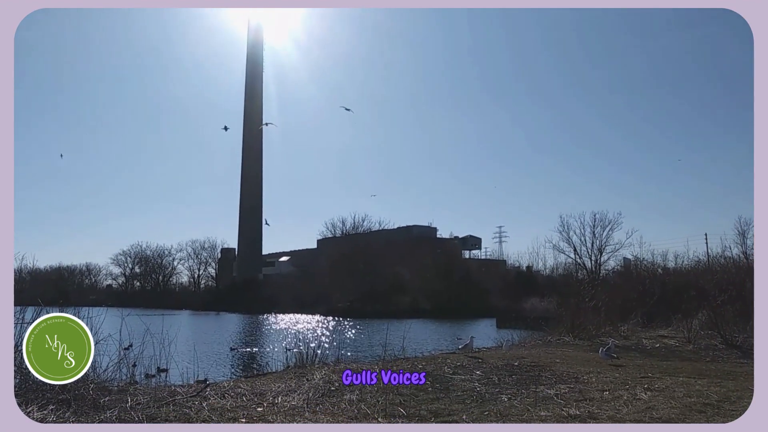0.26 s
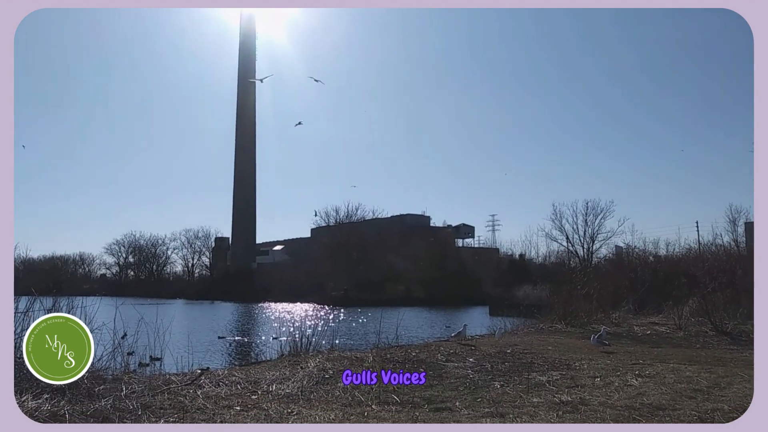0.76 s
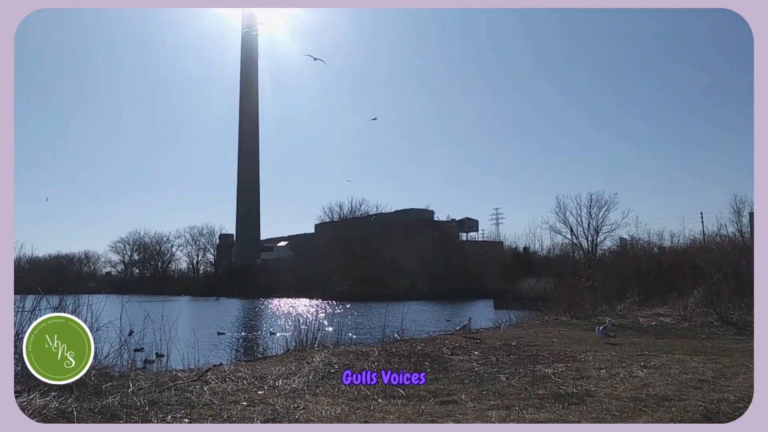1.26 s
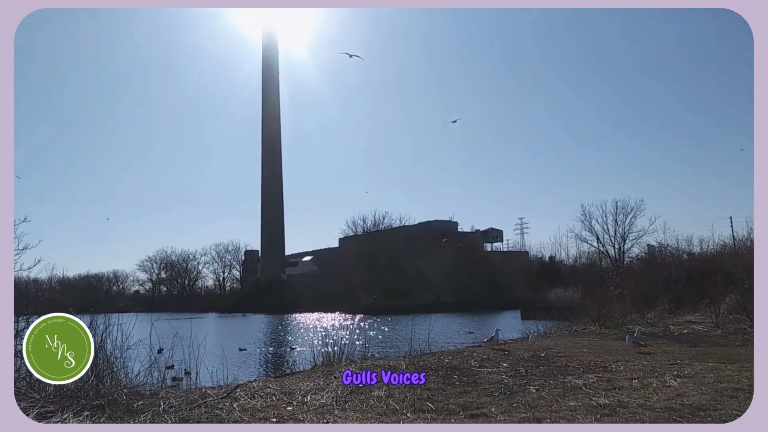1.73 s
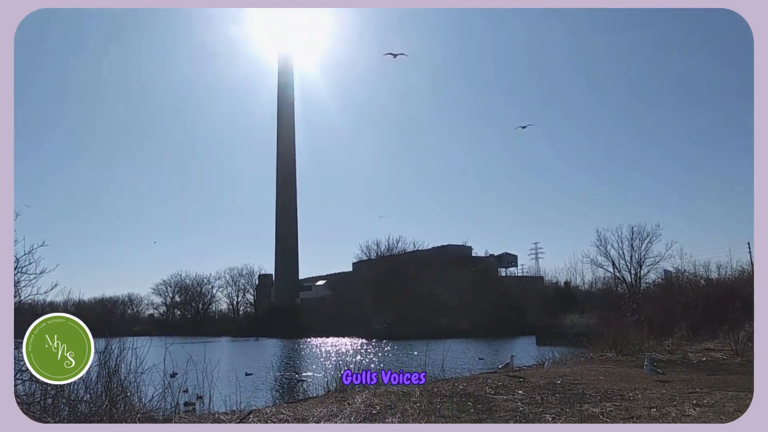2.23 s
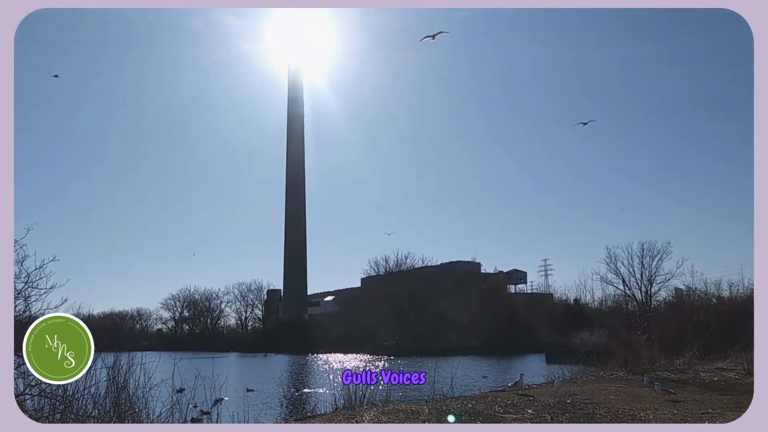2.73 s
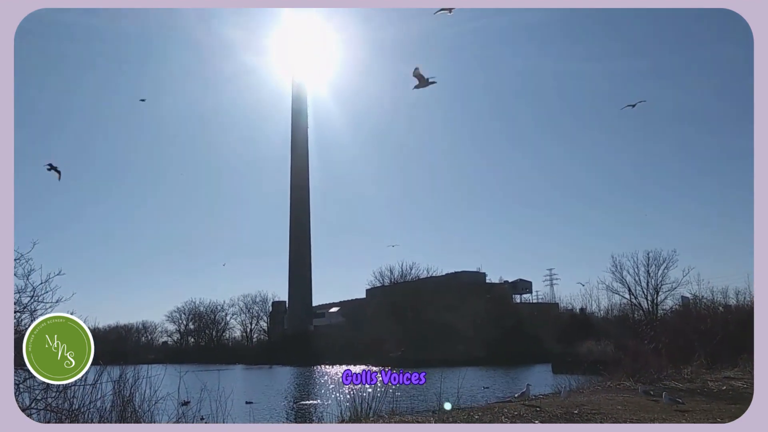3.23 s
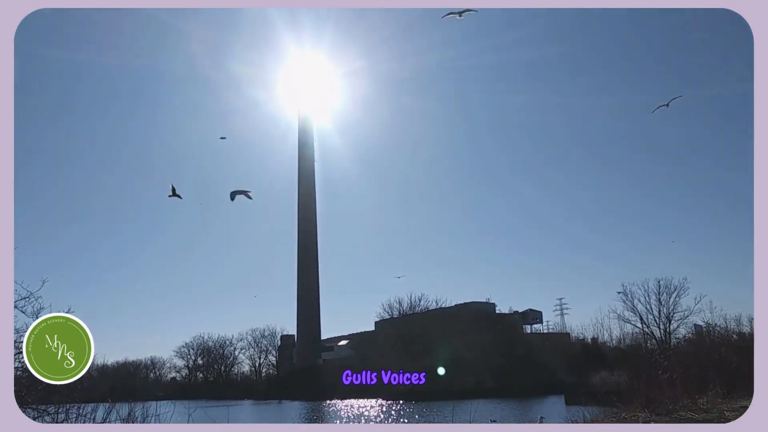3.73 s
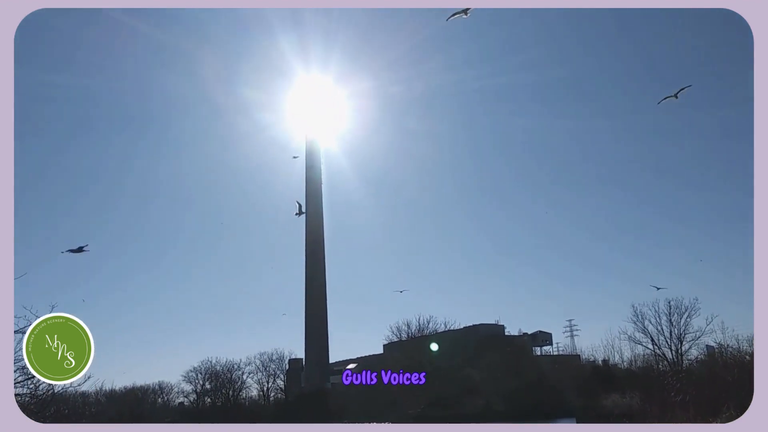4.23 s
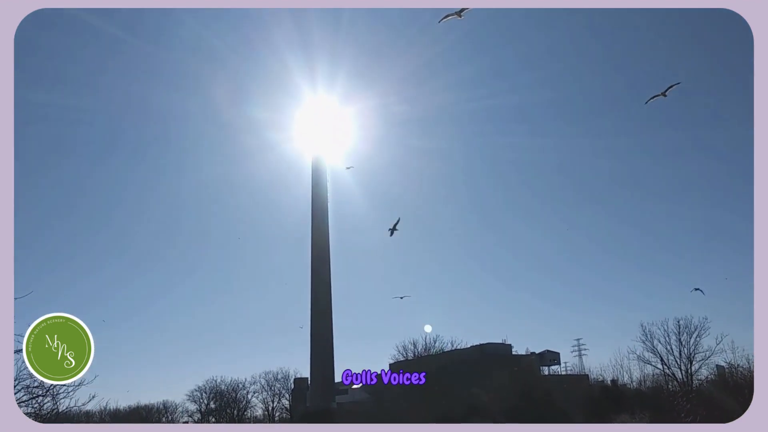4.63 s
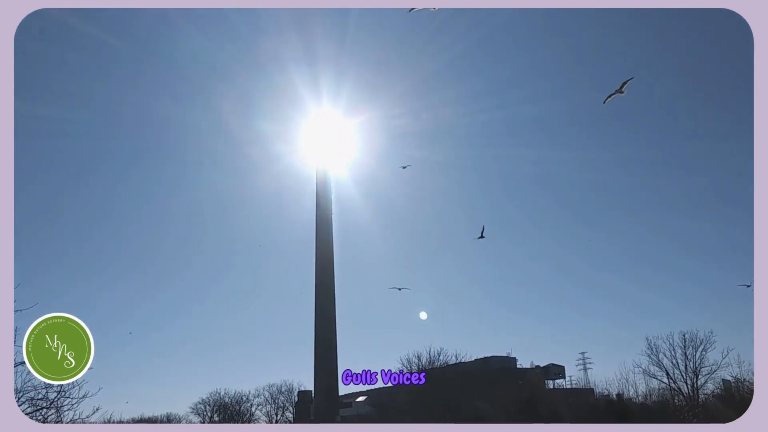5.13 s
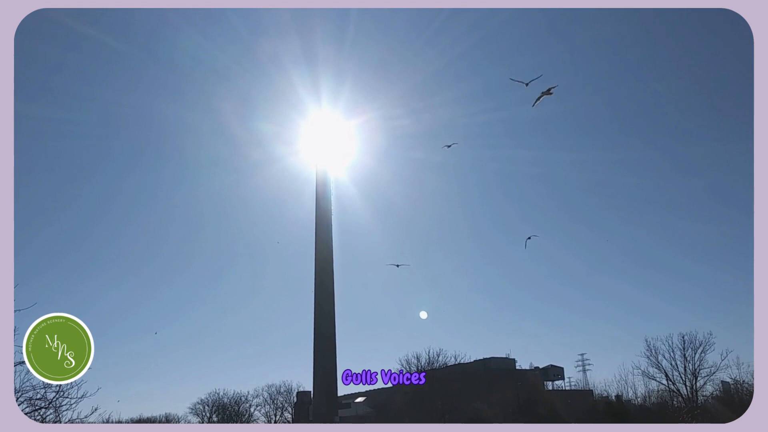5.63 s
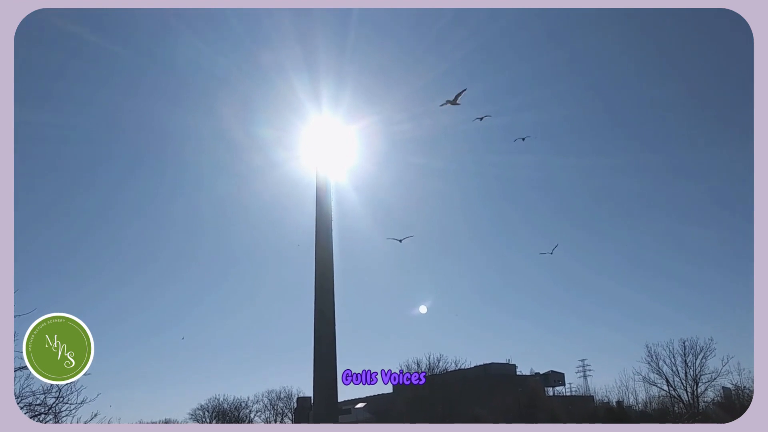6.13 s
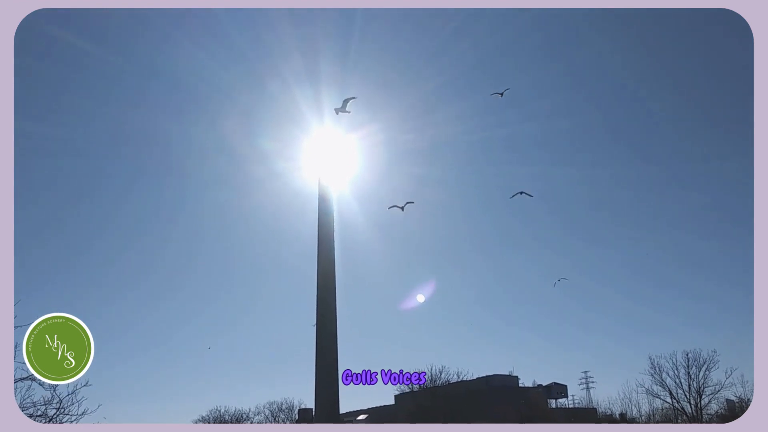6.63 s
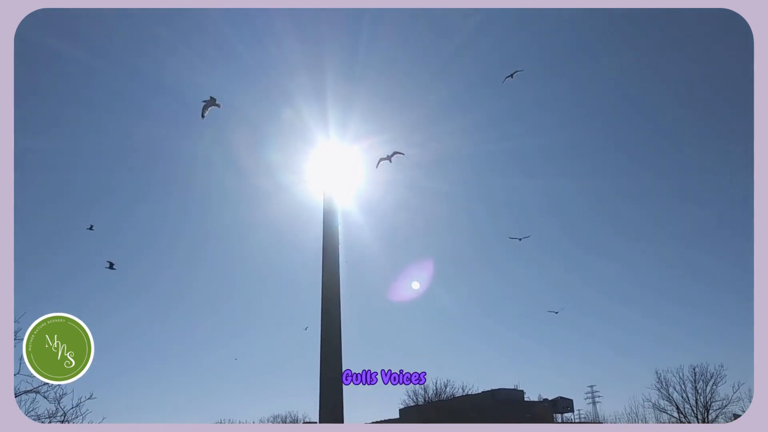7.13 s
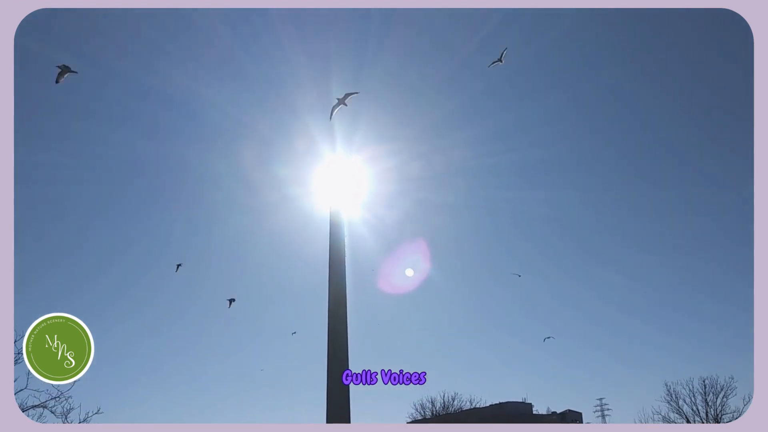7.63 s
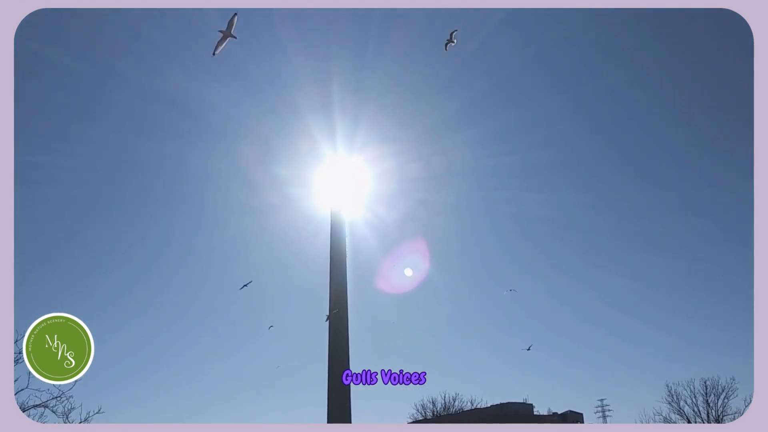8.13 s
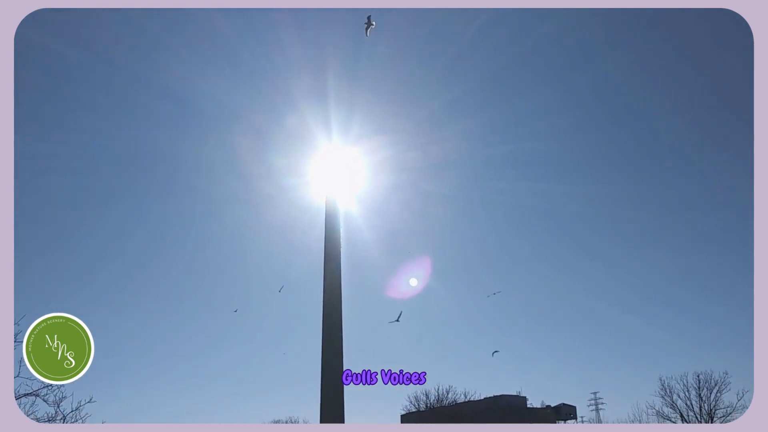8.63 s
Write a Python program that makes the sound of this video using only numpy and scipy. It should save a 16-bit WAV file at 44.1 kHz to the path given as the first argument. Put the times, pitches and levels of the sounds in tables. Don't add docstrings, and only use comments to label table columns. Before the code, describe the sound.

Many gulls wheel over a pond, overlapping mews, clear whistles and hoarse yelps, over a distant colony murmur and wind knocks on the microphone.

```python
import sys
import numpy as np
from scipy import signal
from scipy.fft import rfft, irfft
from scipy.io import wavfile
from scipy.ndimage import uniform_filter1d, minimum_filter1d

SR = 44100
rng = np.random.default_rng(int(sys.argv[2]) if len(sys.argv) > 2 else 0)


def level_to_linear(level):
    exponent = np.asarray(level, float) / 20
    return 10 ** exponent


def pcm_store(signal):
    levels = np.round(np.clip(np.atleast_2d(signal), -1, 1) * 32767)
    wavfile.write(sys.argv[1], SR, levels.astype(np.int16).T)


N = 391608


def amp_of_hz(points, hz):
    f, db = np.transpose(points)
    return level_to_linear(np.interp(np.log(hz + 1), np.log(f), db))


def evened(x):
    return x / np.sqrt(np.mean(x ** 2) + 1e-20)


def coloured(x, points):
    return irfft(rfft(x) * amp_of_hz(points, np.fft.rfftfreq(len(x), 1 / SR)), len(x))


def wobble(count, hz):
    width = max(int(SR / hz / 2), 1)
    smooth = uniform_filter1d(rng.standard_normal(count), width)
    return uniform_filter1d(smooth, width) * np.sqrt(1.7 * width)


def level(rows):
    s, db = np.transpose(rows)
    return level_to_linear(np.interp(np.arange(N) / SR, s, db))


def add(mix, s, sound):
    part = mix[round(s * SR):][:len(sound)]
    part += sound[:len(part)]


# f/Hz, level/dB
BEAK = [(600, -27), (1000, -12), (1500, -2), (2500, 1.5), (3300, 1.5), (4300, 5), (5500, -0.5), (9000, -10)]


def note(rows, throat_hz, rough, fall_db, odd_db=0, first_db=0, top_hz=12000):
    s, *columns = np.transpose(rows)
    t = np.arange(max(s[0] - .01 * rough, 0), s[-1] + .004, 1 / SR)
    hz, db = (np.interp(t, s, c) for c in columns)
    hz = uniform_filter1d(hz, 300)
    rough = np.clip(rough, 0, 1)
    jitter = 0.0035 * wobble(len(t), 36) + 0.125 * rough ** 2 * wobble(len(t), 300)
    turns = np.cumsum(hz * (1 + jitter)) / SR
    k = np.arange(1, top_hz // hz.max() + 1)[:, None]

    octaves = np.log2(k * hz / throat_hz)
    above, below = np.maximum(octaves, 0), np.minimum(octaves, 0)
    shape = level_to_linear(-fall_db * above + 7.23 * below) * amp_of_hz(BEAK, k * hz)
    soft_db = 0.53 * (db.max() - db)
    rate, phase = rng.random((2, len(k), 1))
    drift_db = (4 + 10 * rough) * np.sin(2 * np.pi * ((4 + 16 * rate) * t + phase))
    drift_db = drift_db * np.minimum(abs(octaves), 1)
    shape *= level_to_linear(odd_db * (k % 2) + first_db * (k == 1) + drift_db - soft_db * above)
    shape /= np.median(shape, 1).max()

    flutter = 1 + 0.99 * rough * np.sin(2 * np.pi * 150 * t + 3 * wobble(len(t), 60))
    flutter += 1.1 * rough ** 2 * wobble(len(t), 420)
    attack, release = (t - t[0]) / (.005 + .028 * rough), (t[-1] - t) / .006
    fade = np.minimum(np.minimum(attack, release), 1)
    partials = (shape * np.cos(2 * np.pi * (k * turns + phase))).sum(0)
    return t[0], np.sqrt(2) * level_to_linear(db) * fade * flutter * partials


# t/s, extra overtone fall/(dB per octave)
DISTANCE = [(0, -1), (.6, -4.5), (1, 11.5), (1.4, 0.8), (1.95, -3), (2.2, -0.9), (2.45, 5), (2.7, -3),
            (3.4, -1), (4.2, -4), (4.9, 10.5), (5.5, -6.5), (5.69, 8), (6.0, -5), (6.3, -5.5), (6.65, 5),
            (7.1, -8.5), (7.6, 5), (7.88, 5), (8.2, 4), (8.88, -2)]


def dulled(fall_db, s):
    return max(fall_db + np.interp(s, *np.transpose(DISTANCE)), 4)


def glide(row, voice, rough, power=1, bow=0, odd_db=0):
    start, length, first_hz, last_hz, db = row
    multiple, fall_db, swell_db, fade_db = voice
    u = np.linspace(0, 1, 9)
    hz = (first_hz + (last_hz - first_hz) * u ** power) * (1 + bow * np.sin(np.pi * u))
    db = db + swell_db * np.log2(hz / hz.mean()) + fade_db * (u - .5)
    throat_hz = multiple * hz.mean()
    if throat_hz < 1170:
        throat_hz *= 2
    return note(np.transpose([start + length * u, hz, db]), throat_hz, rough, dulled(fall_db, start), odd_db)


KINDS = "clear open halved hoarse droop rasp scream whistle sigh bow thin yelp".split()
# throat/pitch, overtone fall/(dB per octave),
# louder when higher/(dB per octave), fade over the note/dB
VOICES = [(2.15, 21.5, 10.5, -2), (2.85, 27.5, 8, -3.5), (2.01, 22.5, 4.5, 1), (2.1, 20.5, 4.5, -5),
          (2.02, 19.5, 26.5, -2), (2.2, 22, 9.5, -3), (3.3, 24.5, 23.5, -4), (1.01, 16, 6.5, -1),
          (1.01, 23, -6.5, -10.5), (1.01, 22, 56, -4.5), (1.01, 42, 4, -6)]
YELP_VOICE = (4, 37.5, 7, -6.5)
ROUGH = [.15, .1, .1, .38, .27, .57, .45, .06, .06, .06, .06]


def sing(out, kind, rows, **contour):
    i = KINDS.index(kind)
    voice, rough = (VOICES + [YELP_VOICE])[i], (ROUGH + [0.31])[i]
    for row in rows:
        add(out, *glide(row, voice, rough, **contour))


# start t/s, length/s, first f/Hz, last f/Hz, level/dB
CLEAR = [(.06, 0.38, 1014, 991, -56), (1.41, 0.033, 935, 975, -34), (6.334, .014, 1010, 1000, -33),
         (7.315, .042, 839, 895, -27), (7.83, .045, 826.5, 900, -28.5), (7.91, 0.22, 761, 618, -46),
         (8.295, .04, 754, 827, -26), (8.4, 0.17, 938, 850, -38.5)]
OPEN = [
    (6.37, 0.16, 950, 905, -41.5),
    (8.31, 0.059, 855, 908, -30.5),
    (2.655, 0.058, 610, 760, -37),
]
HALVED = [(7.385, .185, 1028, 983, -30)]
DROOPS = [
    (2.12, 0.11, 887, 662, -69),
    (7.2, 0.073, 756, 653, -41.5),
]


def clear_calls(out):
    sing(out, "clear", CLEAR)
    sing(out, "open", OPEN)
    sing(out, "halved", HALVED, odd_db=-13.5)
    sing(out, "droop", DROOPS, power=2.5)


HOARSE = [(.44, .105, 569, 790, -39.5), (3.492, 0.094, 556, 791, -46.5), (0.126, 0.075, 700, 1059, -55),
          (0.352, 0.044, 798, 680, -50), (.741, .068, 705, 655, -45), (.808, .065, 670, 570, -45),
          (.872, .022, 650, 550, -48), (6.55, .03, 760, 520, -43), (6.565, .04, 640, 800, -43),
          (5.69, .04, 760, 625, -45), (6.72, .095, 790, 700, -38.5), (2.712, .062, 761, 787, -38.5),
          (2.979, 0.15, 1030, 990, -54.5), (6.225, 0.048, 735, 573, -37.5), (6.34, .21, 775, 625, -39.5),
          (2.483, 0.038, 755, 731, -46), (8.092, 0.017, 871, 707, -30), (8.56, 0.11, 766, 666, -44),
          (8.77, .105, 720, 680, -36)]
YELPS = [
    (2.0, 0.096, 795, 804.6, -42),
    (6.043, 0.033, 525, 650, -34),
    (6.799, 0.051, 568, 730, -36),
]
RASPS = [(8.172, .05, 608, 866, -45.5), (2.07, 0.033, 831, 863, -43), (4.411, .07, 615, 887, -42.5),
         (1.697, .035, 800, 600, -50), (1.997, .02, 900, 800, -40), (2.645, .02, 600, 620, -44),
         (6.266, .025, 614, 802, -36.5), (7.285, .03, 640, 732, -36.5), (7.354, 0.033, 851, 841, -33),
         (7.575, 0.024, 870, 740, -27.5), (7.812, 0.03, 641, 801, -36.5), (7.875, 0.023, 962, 866, -27),
         (8.263, 0.038, 668, 767, -36.5), (8.335, .065, 790, 915, -30), (8.53, 0.017, 920, 727, -29.5)]
SCREAMS = [(0.48, 0.3, 909, 662, -50.5), (2.12, 0.12, 912, 699, -51.5), (6.345, 0.12, 990, 930, -44.5),
           (7.199, 0.049, 905, 757, -47.5), (1.92, 0.045, 599, 690, -41), (1.216, 0.057, 690, 870, -50.5),
           (1.385, 0.026, 590, 730, -42), (4.078, 0.062, 790, 930, -48), (5.425, 0.04, 600, 810, -41),
           (6.975, 0.047, 600, 900, -39), (8.672, 0.027, 645, 635, -38), (8.53, .1, 900, 660, -46.5),
           (8.775, .07, 900, 920, -42), (3.47, .05, 700, 800, -55)]


def rough_calls(out):
    sing(out, "hoarse", HOARSE)
    sing(out, "yelp", YELPS)
    sing(out, "rasp", RASPS)
    sing(out, "scream", SCREAMS)


WHISTLES = [(0, 0.061, 1806, 1897, -47.5), (1.328, 0.117, 2490, 2370, -35),
            (1.501, 0.22, 1680, 1800, -47.5), (2.415, 0.071, 1503, 1436, -42),
            (2.811, 0.076, 1910, 1989, -36.5), (7.39, 0.13, 2300, 2240, -42.5),
            (7.62, 0.21, 2035, 2040, -65), (7.7, .11, 2790, 2760, -60), (8.4, 0.13, 2062, 1943, -31),
            (8.621, 0.18, 2330, 2300, -44)]
SIGHS = [
    (0, 0.04, 1310, 1146, -47),
    (.62, 0.075, 1908, 1830, -40.5),
    (.927, 0.15, 1940, 1730, -48),
    (3.15, 0.15, 1966, 1776, -49.5),
    (4.26, 0.24, 2270, 2110, -51),
]
BOWS = [
    (.445, 0.1, 1750, 1800, -38),
    (1.04, 0.15, 2090, 1930, -54),
    (5.12, .11, 1797, 1743, -53),
]
THIN = [(2.885, 0.063, 2423, 2493, -32.5), (.425, .025, 1500, 1520, -46), (2.335, 0.099, 2600, 2200, -55),
        (5.05, .065, 1945, 1930, -52), (5.05, .065, 2920, 2900, -60), (0.885, .045, 1490, 1530, -47),
        (1.735, .15, 1480, 1320, -56), (3.595, 0.077, 1880, 1800, -44), (4.811, .006, 2500, 2430, -22),
        (.06, .04, 1490, 1490, -52.5), (3.605, 0.05, 2560, 2050, -39), (7.52, .04, 2230, 2050, -45),
        (7.6, .045, 1450, 1350, -48), (5.319, 0.17, 1860, 1898, -55), (8.235, 0.075, 2000, 1990, -45),
        (.57, .05, 1620, 1590, -41.5), (4.235, .03, 2700, 2820, -52), (.95, 0.089, 2600, 2500, -61.5),
        (3.3, 0.092, 2050, 2000, -60.5), (3.66, .1, 4300, 3780, -62), (.56, .125, 4580, 3900, -48.5),
        (5.62, .065, 2150, 1960, -34), (5.62, .06, 4300, 4000, -53), (5.63, .05, 2460, 2350, -46),
        (5.28, .05, 1500, 1560, -60), (5.23, .05, 2450, 2300, -62), (8.7, .07, 1345, 1440, -36),
        (7.128, .05, 4640, 4380, -38), (8.475, .05, 2500, 2520, -42), (5.2, .08, 1250, 1400, -65.5)]


def whistles(out):
    sing(out, "whistle", WHISTLES)
    sing(out, "sigh", SIGHS)
    sing(out, "bow", BOWS, bow=.07)
    sing(out, "thin", THIN)


# start t/s, length/s, top f/Hz, level/dB, throat/top pitch
MEWS = [
    (0.545, 0.2, 773, -32.5, 1.85),
    (2.776, .11, 850.4, -27, 1.85),
    (3.573, .205, 797, -36.5, 1.85),
    (4.474, .215, 896, -35.5, 2.45),
]
# share of length, share of top pitch, level/dB
MEW = [
    (0, 1, 1.5),
    (.45, 0.91, -5),
    (.88, .81, -7),
    (1.002, 0.68, -17),
]
# overtone fall/(dB per octave), odd partials/dB, first partial/dB
MEW_COLOURS = [(17.8, -11.5, 15.5), (25, -4, 1.5), (30, -11.5, 12.5), (32.3, -2.5, 11)]


def mews(out):
    for (start, length, hz, db, multiple), colour in zip(MEWS, MEW_COLOURS):
        rows = [(start + u * length, hz * share, db + d) for u, share, d in MEW]
        add(out, *note(rows, multiple * hz, .22, *colour))


# t/s, f/Hz, level/dB
PEALS = [
    [(6.85, 713, -30), (6.928, 798, -26.5), (6.945, 758, -28.5), (6.965, 625, -49.5)],
    [(8.81, 967, -42), (8.835, 966.4, -32), (8.845, 1151, -30), (8.88, 1160, -26)],
    [(1.25, 959, -37), (1.27, 954, -40.5), (1.285, 1003, -38.5), (1.325, 1003, -37), (1.334, 1050, -35)],
    [(1.44, 1010, -35), (1.453, 1150, -37), (1.49, 1200, -36), (1.55, 1098, -39.5), (1.59, 1088, -40),
     (1.603, 1156, -47), (1.7, 930, -45.5)],
    [(6.077, 807, -26.5), (6.122, 840, -26.5), (6.134, 875, -28.5)],
    [(6.293, 818, -27), (6.32, 843, -28), (6.333, 880, -30)],
    [(6.607, 856, -36.5), (6.67, 859, -34.5), (6.7, 868, -36.5), (6.712, 900, -40)],
    [(.203, 1110, -43.5), (.31, 1110, -46.5), (.335, 1050, -50), (.355, 900, -58)],
    [(1.955, 796, -44), (1.98, 827, -36.5), (2.002, 975, -36.5)],
    [(2.525, 637, -41.5), (2.59, 586, -47.5), (2.62, 629, -46), (2.645, 569, -49.5)],
    [(4.82, 860, -35), (4.845, 833, -37.5), (4.885, 700, -40)],
    [(7.015, 983, -30.5), (7.045, 1000, -31.5), (7.075, 1020, -24.5), (7.085, 982, -26.5), (7.13, 996, -28)],
    [(5.46, 905, -42), (5.505, 942, -36.5), (5.55, 976, -37), (5.6, 914, -39), (5.68, 846, -52)],
    [(6.135, 771, -30), (6.175, 760, -32), (6.222, 647, -39)],
    [(7.0, 961, -39), (7.03, 991, -37.5), (7.06, 997, -36.5)],
    [(3.15, 1235, -80), (3.21, 1240, -66), (3.35, 1192, -70), (3.5, 1170, -68)],
]
# t/s, f/Hz, level/dB
CRIES = [
    [(2.715, 381, -36), (2.735, 381, -35), (2.76, 386, -38)],
    [(8.218, 860, -40), (8.26, 862, -38), (8.31, 868, -40)],
    [(8.697, 670, -38), (8.73, 682, -36), (8.772, 725, -35)],
    [(5.44, 800, -40), (5.47, 770, -36), (5.505, 745, -41)],
]
# throat f/Hz, overtone fall/(dB per octave), odd partials/dB
PEAL_THROATS = [(2330, 20, 2.5), (2300, 24, -2), (2010, 17, -5.5), (2300, 23.5, 0), (2390, 20.5, -1),
                (1980, 22, 0), (2630, 62, 1.5), (2240, 16, -12), (2632, 26.5, -1), (1560, 30, -2.5),
                (2620, 36, 3.5), (1970, 18, -22.5), (1980, 13.5, -25), (2980, 22, -6.5), (3000, 13.5, 5),
                (4900, 43, 2), (1900, 20, 6), (2600, 40, 3), (3100, 45, -5), (2300, 20, 2)]
PEAL_ROUGH = [.1, .1, .1, .1, .08, .1, .08, .08, .25, .2, .45, .2, .17, .5, .36, .55, .1, .08, .12, .42]


def peals(out):
    for rows, (throat_hz, fall_db, odd_db), rough in zip(PEALS + CRIES, PEAL_THROATS, PEAL_ROUGH):
        add(out, *note(rows, throat_hz, rough, fall_db, odd_db))


# t/s, f/Hz, level/dB
HELD = [
    [(.06, 3060, -48.5), (.21, 2968, -46), (.3, 3042, -44), (.45, 2968, -42.5), (.48, 2850, -40.5)],
    [(1.71, 2974, -48), (1.8, 2943, -50), (1.9, 2980, -48.5), (2.08, 2905, -46.5), (2.105, 2600, -38)],
    [(2.1, 1950, -31), (2.405, 1935, -38), (2.425, 1780, -38)],
    [(2.945, 3174, -42), (3.12, 2910, -44), (3.2, 3005, -41.5), (3.52, 3037, -36.5), (3.59, 2854, -36.5)],
    [(4.485, 2988, -36.5), (4.77, 3000, -39), (4.81, 2860, -38)],
    [(7.9, 2048, -33.5), (7.925, 2110, -38), (7.965, 2170, -32), (8.03, 2090, -35), (8.08, 1990, -28),
     (8.097, 1960, -30)],
    [(4.14, 1900, -41), (4.2, 1870, -43), (4.3, 1800, -47), (4.48, 1790, -48)],
    [(7.122, 2220, -27), (7.138, 2310, -25), (7.2, 2140, -29)],
]


def held_whistles(out):
    for rows in HELD:
        hz = np.mean(rows, 0)[1]
        fall_db = 10.5 * hz / 1000
        add(out, *note(rows, hz, .06, dulled(fall_db, rows[0][0])))


# t/s, f/Hz, level/dB
SQUEALS = [
    [(.85, 2094, -55), (.95, 2460, -66.5), (1.05, 3190, -66), (1.105, 3730, -70)],
    [(1.74, 2250, -58), (1.8, 2720, -55), (1.9, 3550, -60)],
    [(1.855, 1850, -56), (1.885, 2250, -54), (1.915, 2650, -54)],
    [(2.43, 2300, -58.5), (2.49, 2860, -52), (2.55, 3140, -61.5), (2.605, 3490, -58)],
]


def squeals(out):
    for rows in SQUEALS:
        add(out, *note(rows, 2000, .3, 0, top_hz=4000))


def gulls():
    out = np.zeros(N)
    for calls in (clear_calls, rough_calls, whistles, mews, peals, squeals, held_whistles):
        calls(out)
    return out


KEKS = [3.773, 3.911, 4.051, 4.194, 4.33, 4.608, 4.749, 4.886, 5.027, 5.163, 5.3, 5.579, 5.839, 5.981]
# t/s, f/Hz
KEK = [
    (-.006, 2450),
    (.008, 2810),
    (.024, 2600),
]


def keks(db=-51):
    out = np.zeros(N)
    for s in KEKS:
        rows = [(s + u, hz, db) for u, hz in KEK]
        add(out, *note(rows, 2870, 0.27, 70))
    return out


# t/s, f/Hz, level/dB
BUZZ = [
    (5.885, 5950, -75),
    (5.895, 5700, -58),
    (5.921, 5150, -52),
    (5.962, 4790, -46.5),
    (6.039, 4540, -49),
    (6.248, 4440, -55),
]


def buzz(trill_hz=240):
    s, hz, db = np.transpose(BUZZ)
    t, out = np.arange(s[0], s[-1], 1 / SR), np.zeros(N)
    beat = 2 * np.pi * trill_hz * t + .1 * wobble(len(t), 60)
    turns = np.cumsum(np.interp(t, s, hz) + 130 * np.sin(beat)) / SR
    tone = np.sin(2 * np.pi * turns) + .035 * np.sin(4 * np.pi * turns)
    add(out, s[0], level_to_linear(np.interp(t, s, db)) * (1 + .8 * np.cos(beat)) * tone)
    return out


def banks(x, t60=0.44):
    t = np.arange(SR // 2) / SR
    tail = rng.standard_normal(len(t)) * level_to_linear(-60 * t / t60) * (t > .008)
    tail = signal.lfilter([1], [1, -.6], tail)
    return signal.oaconvolve(x, tail / np.linalg.norm(tail))[:N]


# t/s, level/dB
FLOCK = [(0, -48), (.8, -55.5), (1.18, -67), (1.5, -54), (1.85, -59.5), (2.3, -57.5), (3.0, -46),
         (3.4, -57.5), (3.7, -47.5), (3.88, -56), (4.0, -70), (5.1, -59), (5.4, -60), (5.9, -63),
         (8.88, -58.5)]
# f/Hz, level/dB
FLOCK_COLOUR = [(500, -50), (1200, -11), (1900, 3.5), (2800, -1), (3600, -18), (5200, -27), (6200, -70)]


def flock(count=10):
    voices = 0
    for hz in rng.uniform(1400, 3200, count):
        turns = np.cumsum(hz * (1 + 0.07 * wobble(N, 5))) / SR
        voices = voices + level_to_linear(9 * wobble(N, 10)) * np.sin(2 * np.pi * turns)
    blur = evened(coloured(rng.standard_normal(N), FLOCK_COLOUR)) * level_to_linear(3 * wobble(N, 9))
    return level(FLOCK) * evened(evened(coloured(voices, FLOCK_COLOUR)) + .55 * blur)


# t/s, level/dB
WIND = [(0, -68), (.2, -61.5), (.6, -75), (1.05, -65.5), (1.4, -71.5), (1.6, -56), (2.2, -66.5),
        (2.4, -58.5), (3.1, -51), (3.5, -58.5), (4.1, -70), (4.5, -80), (5.1, -73), (6.2, -78), (6.5, -90),
        (7.75, -90), (7.85, -64), (8.4, -68), (8.6, -88), (8.88, -90)]
# f/Hz, level/dB
WIND_COLOUR = [(50, -44), (110, -30), (190, -8), (340, -1), (520, -18), (1000, -44), (2500, -110)]
# t/s, peak level/dB
KNOCKS = [(0.165, -37), (0.181, -38.5), (1.041, -46), (1.1, -44), (1.626, -48.5), (1.874, -22.5),
          (1.971, -34), (2.01, -34), (2.344, -37), (2.468, -43.5), (2.739, -38), (2.874, -27.5),
          (2.91, -28), (3.102, -30.5), (3.173, -42.5), (3.578, -35), (4.003, -39), (4.027, -38.5)]


def wind():
    push = level(WIND) * rng.standard_normal(N) * level_to_linear(3.5 * wobble(N, 30) + 2.5 * wobble(N, 14))
    buffeting = coloured(push, WIND_COLOUR) / coloured(push / level(WIND), WIND_COLOUR).std()
    t, knocks = np.arange(2000) / SR, np.zeros(N)
    for s, db in KNOCKS:
        rattle = rng.standard_normal(len(t)) * np.exp(-t / .012) * 0.12
        rattle[100] += 1
        add(knocks, s, -level_to_linear(db + 61) * rattle)
    return buffeting + coloured(np.gradient(knocks), WIND_COLOUR)


# f/Hz, level/dB
HUM_COLOUR = [(40, -40), (120, -30), (230, -12), (335, 0), (430, -18), (600, -28), (1200, -40)]


def town_hum():
    return level_to_linear(-78 + 2 * wobble(N, 6)) * evened(coloured(rng.standard_normal(N), HUM_COLOUR))


# f/Hz, level/dB
MICROPHONE = [(350, -40), (650, 2), (5600, 2), (6400, -9), (7200, -12.5), (8500, -4), (10000, -9.5),
              (16000, -5)]


def scene():
    near, far = gulls() + buzz(), keks()
    birds = near + far + banks(level_to_linear(-17.0) * near + level_to_linear(-11) * far)
    return (coloured(birds, MICROPHONE) + flock() + wind() + town_hum())[None]


def roll_off(x):
    return signal.sosfilt(signal.butter(12, 15720, fs=SR, output="sos"), x)


def record(dry):
    mask_db, mask_hz = -36, 900
    z = signal.stft(dry, nperseg=1024)[2]
    power = abs(z) ** 2
    loudest = -minimum_filter1d(-power, size=int(mask_hz * 1024 / SR), axis=1)
    mask = loudest * level_to_linear(2 * mask_db)
    kept = signal.istft(z * power / (power + mask + 1e-30), nperseg=1024)[1][:, :N]
    hiss = level_to_linear(-84.5) * rng.standard_normal(dry.shape)
    return roll_off(kept + hiss)


dry = scene()
out = record(dry)
pcm_store(out)
```